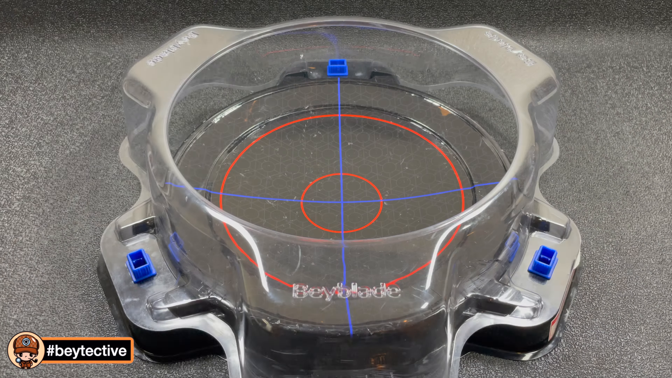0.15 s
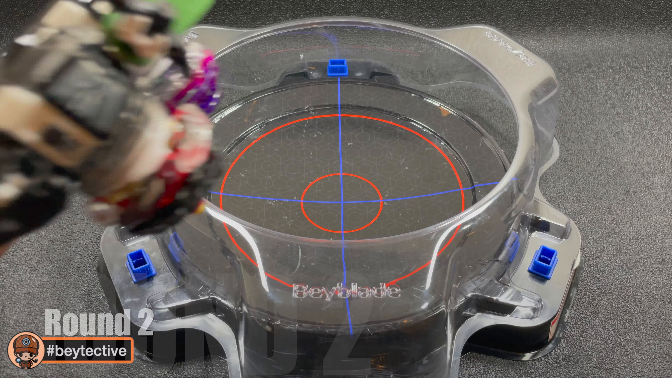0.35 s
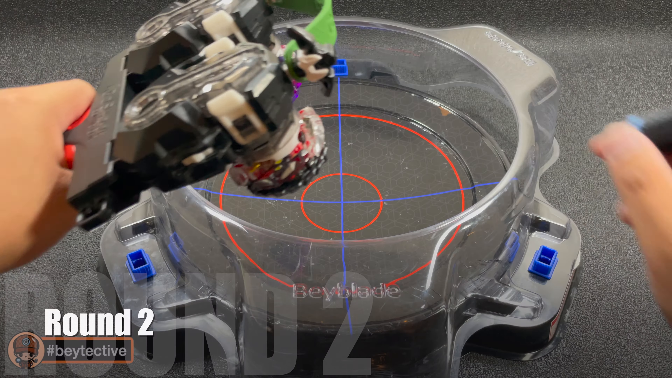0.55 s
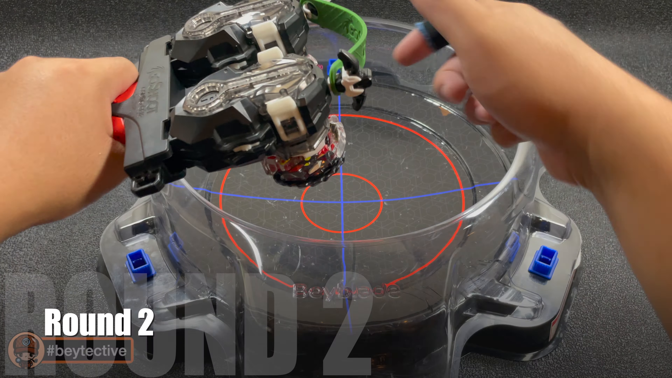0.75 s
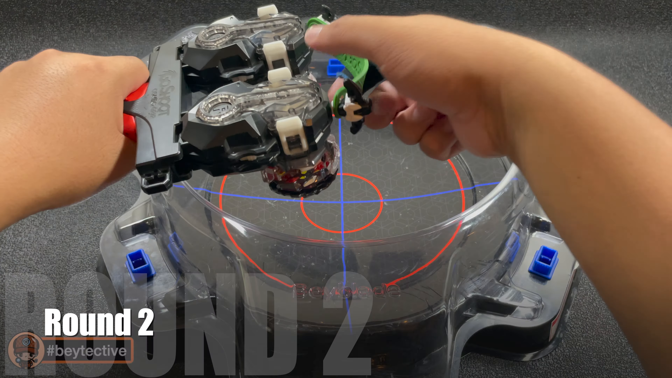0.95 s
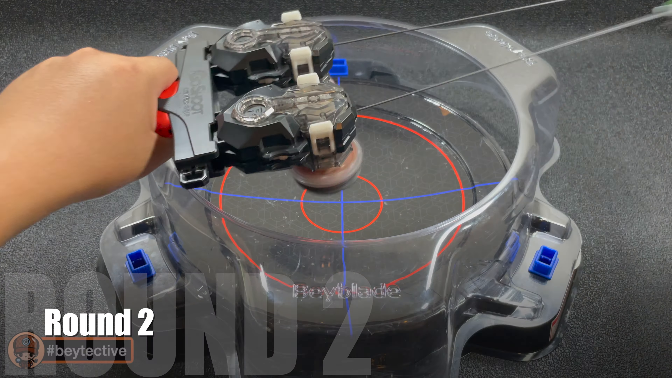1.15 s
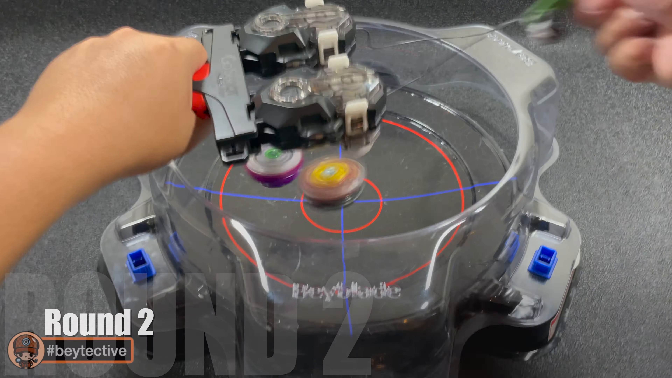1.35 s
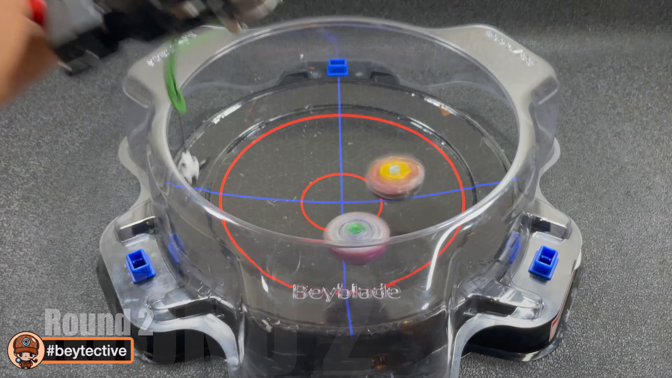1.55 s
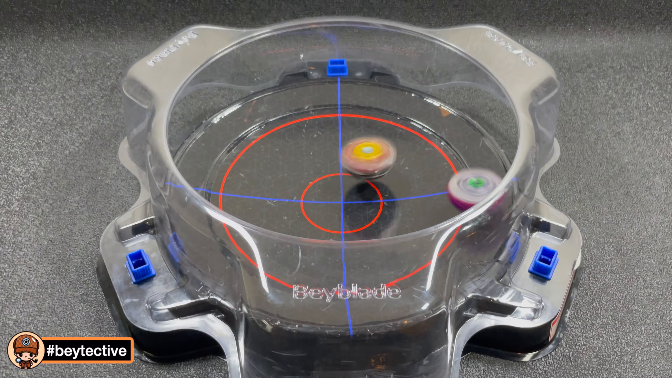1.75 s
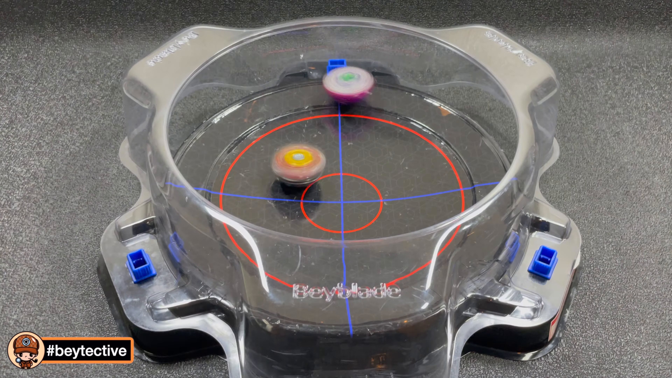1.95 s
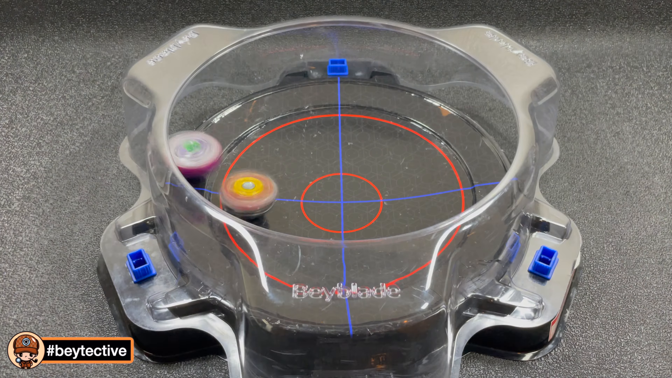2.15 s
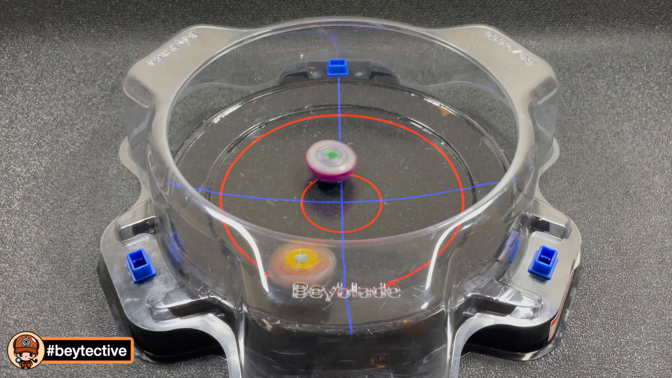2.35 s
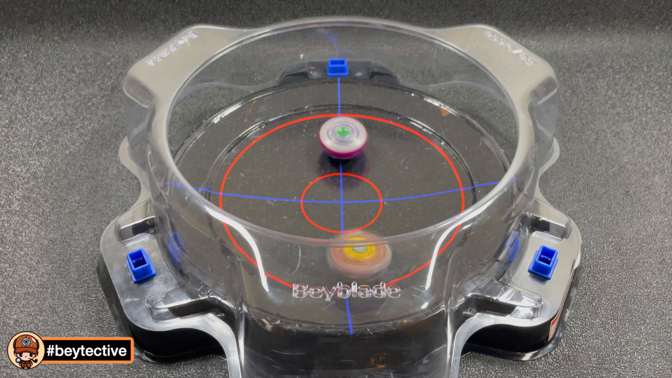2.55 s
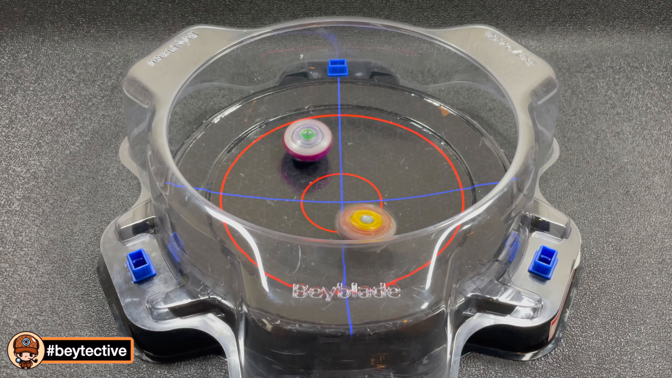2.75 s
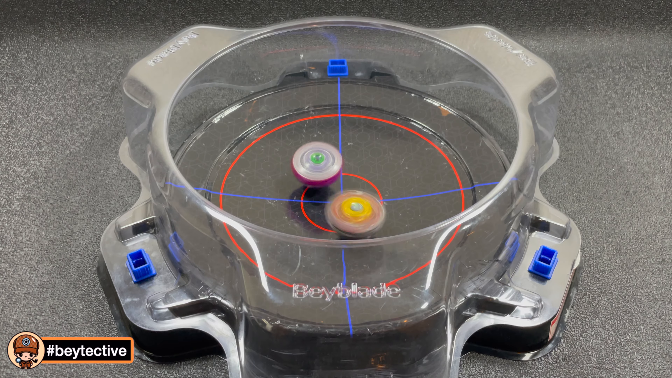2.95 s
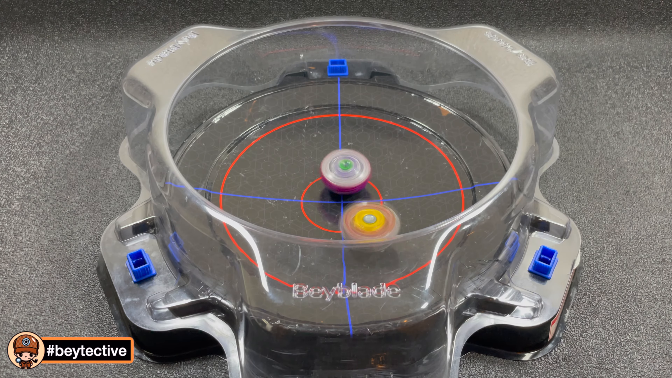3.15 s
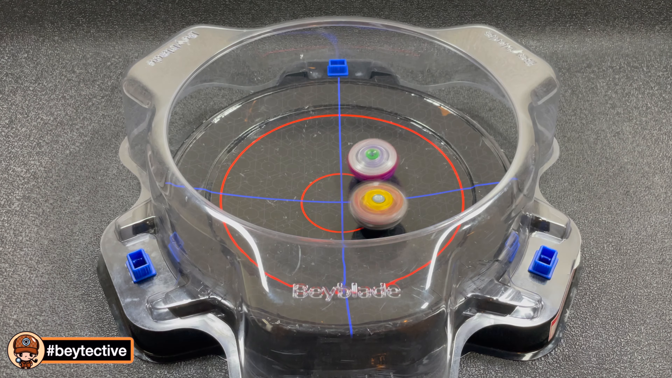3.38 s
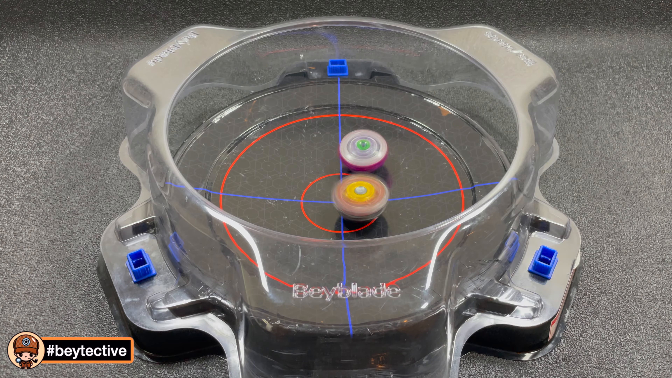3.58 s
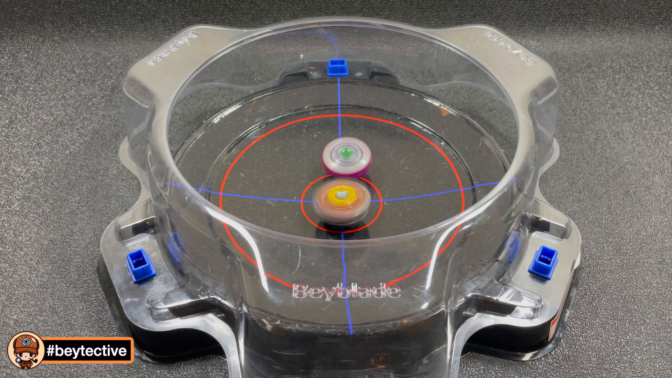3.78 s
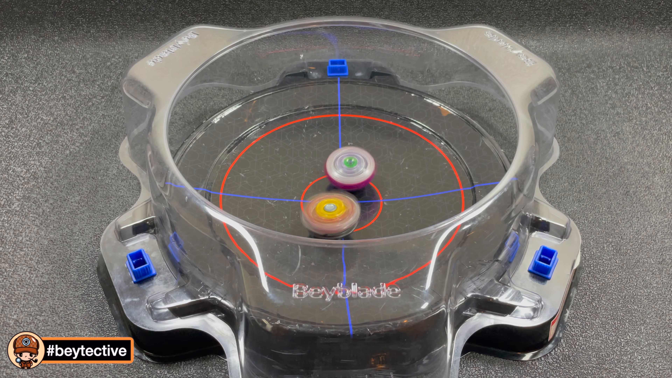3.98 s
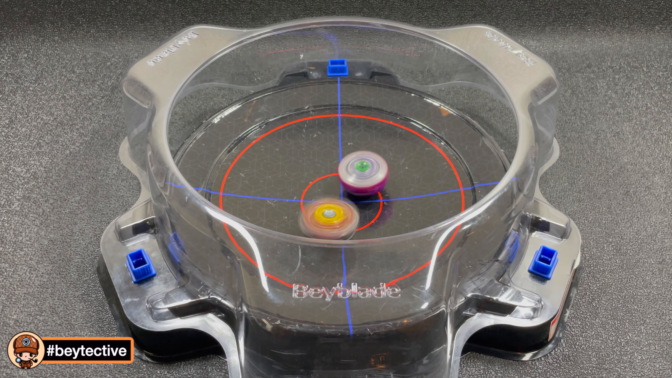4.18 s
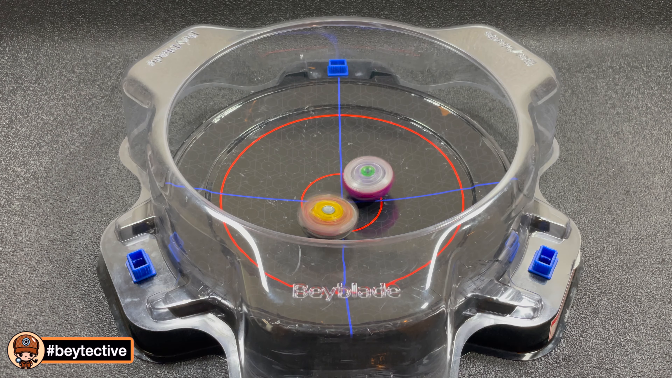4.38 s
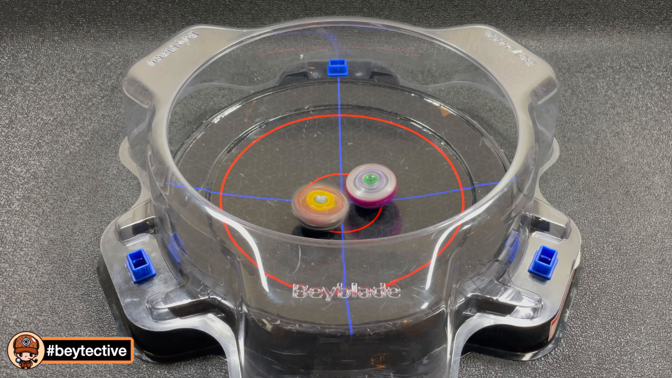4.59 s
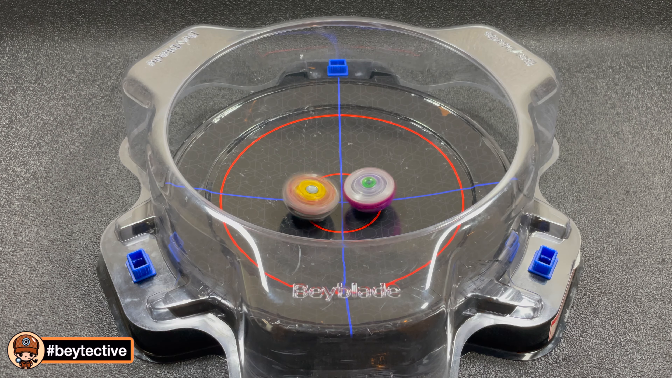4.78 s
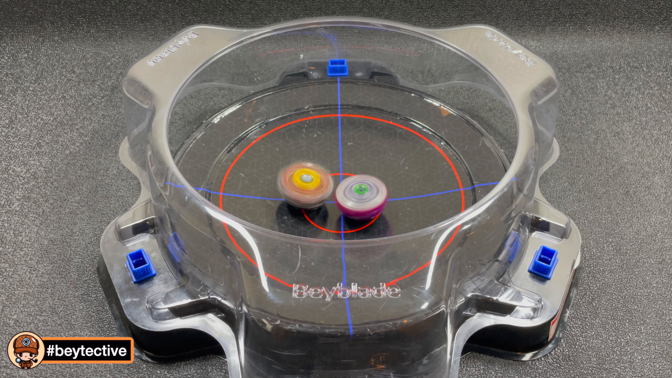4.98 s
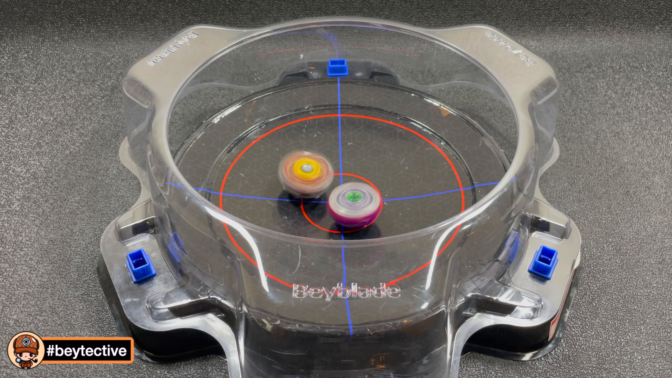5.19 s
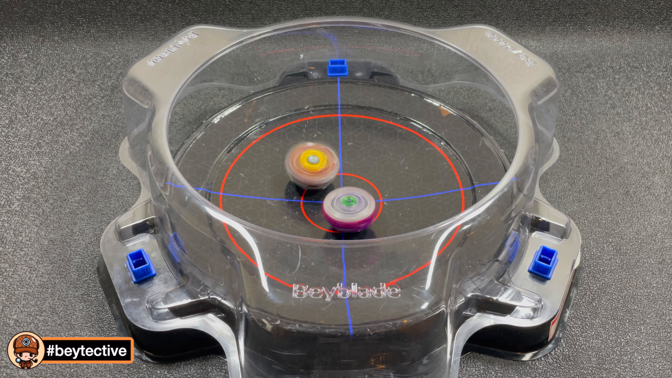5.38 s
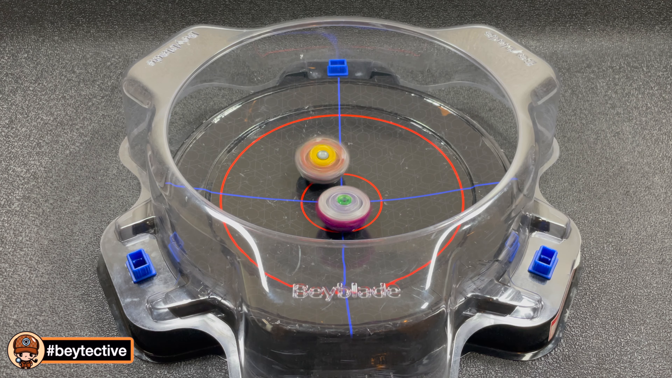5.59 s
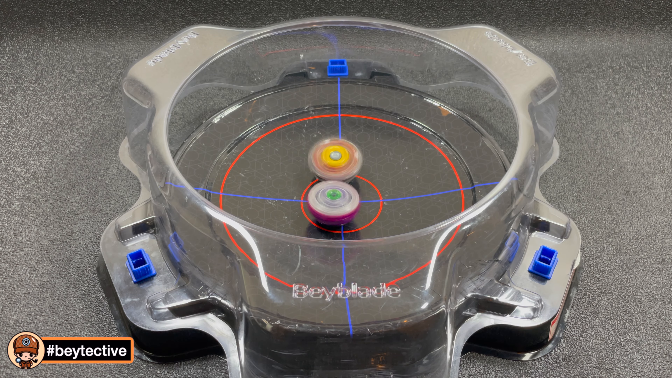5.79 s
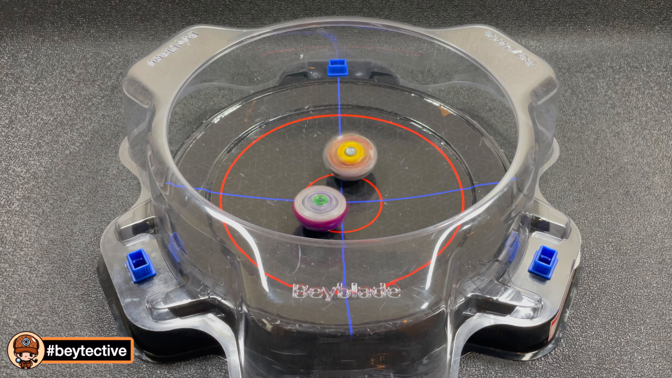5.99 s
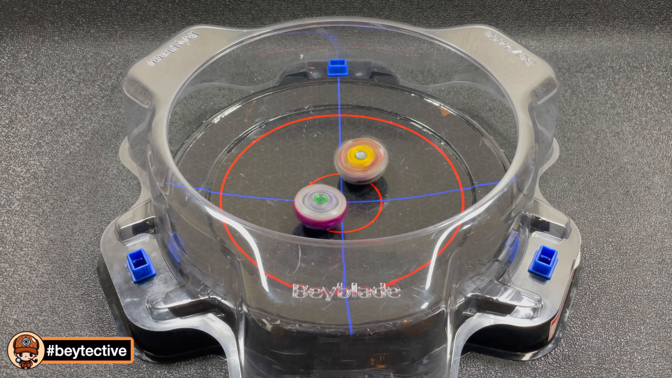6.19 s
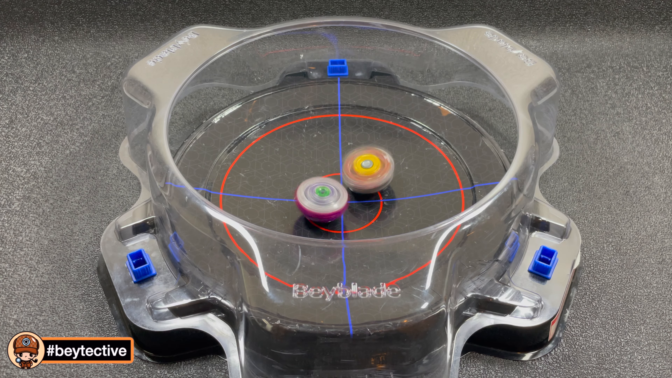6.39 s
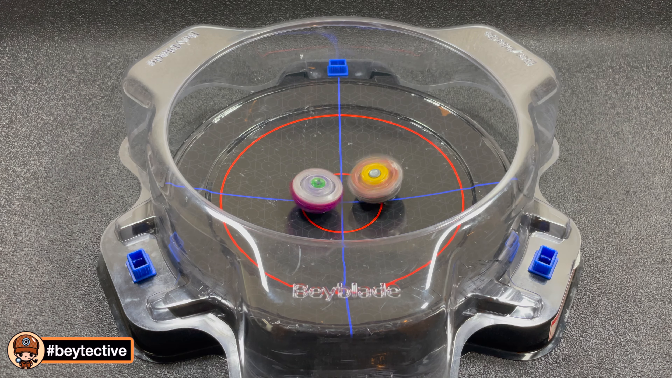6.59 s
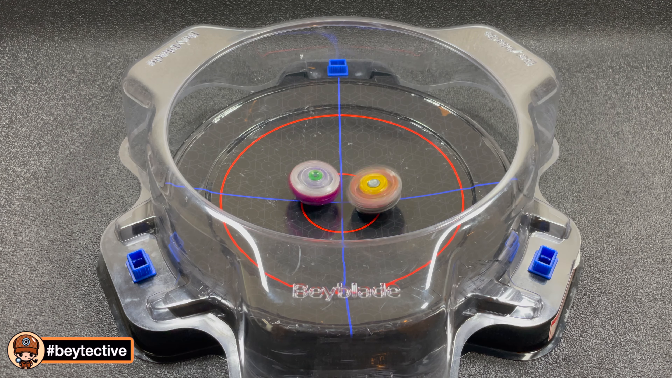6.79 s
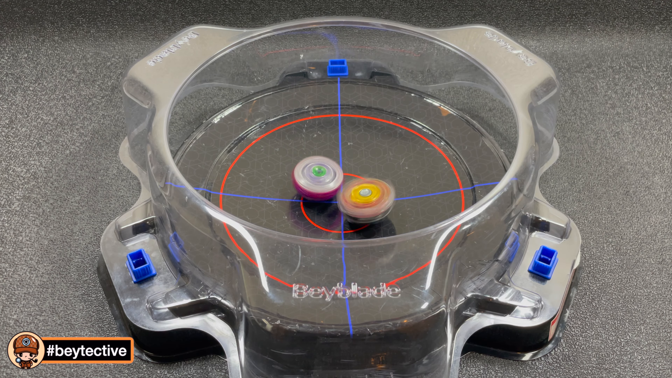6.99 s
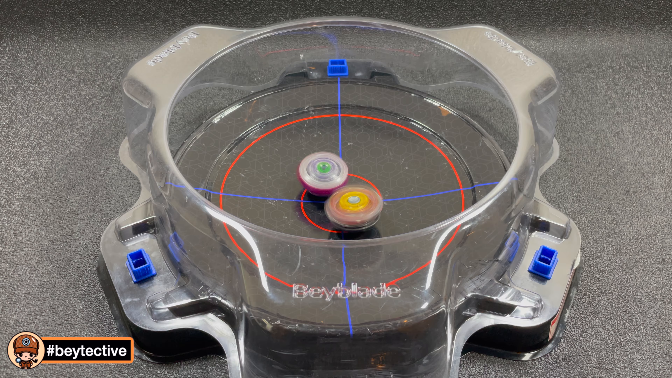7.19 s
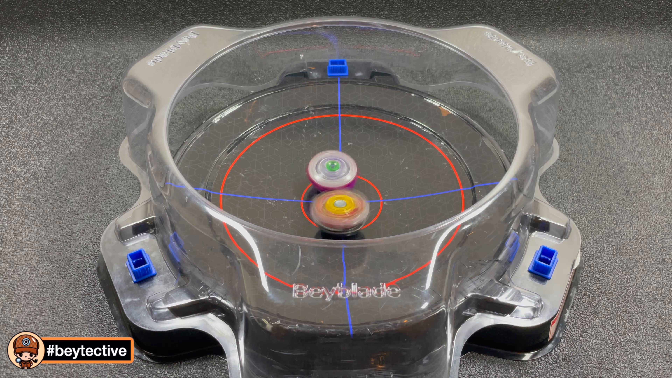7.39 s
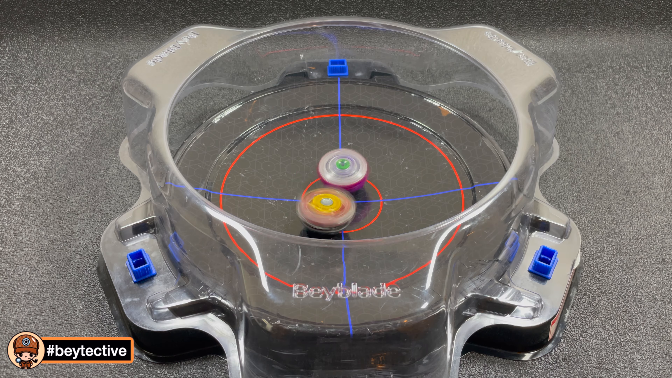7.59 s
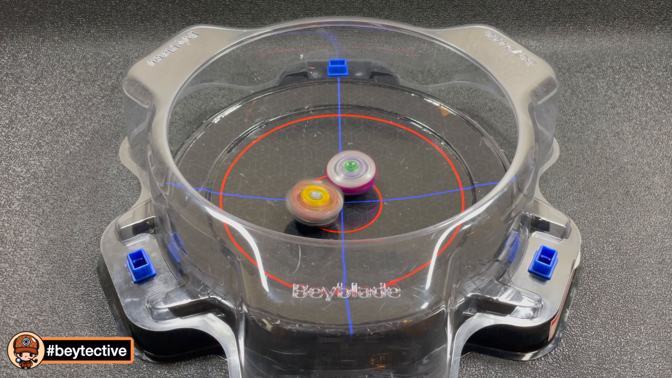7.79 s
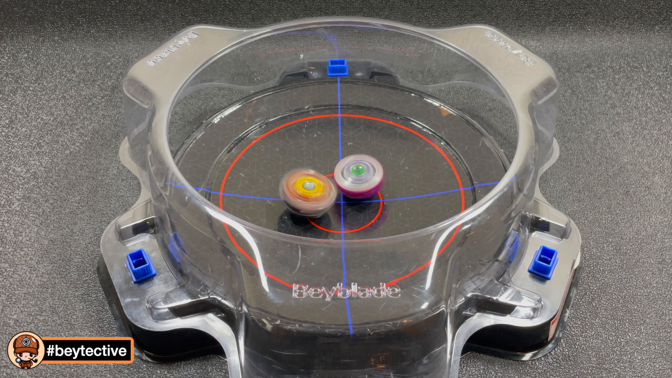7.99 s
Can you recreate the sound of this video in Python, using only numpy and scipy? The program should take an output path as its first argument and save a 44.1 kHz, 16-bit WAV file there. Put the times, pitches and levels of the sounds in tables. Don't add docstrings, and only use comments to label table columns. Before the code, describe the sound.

Near silence and a tiny plastic scuff, a brief gear-teeth zip, then a dense burst of hard knocks as two spinning tops land and strike a resonant plastic arena on a table that thuds low. Scraping and ticking thin out into faint whirrs, broken by sharp top-against-top clacks that weaken toward the end. Recorded close in a small, lightly reverberant room, with soft air murmur.

```python
import sys
import numpy as np
from scipy import signal
from scipy.fft import rfft, irfft, next_fast_len
from scipy.io import wavfile
from scipy.ndimage import uniform_filter1d

SR = 44100
rng = np.random.default_rng(int(sys.argv[2]) if len(sys.argv) > 2 else 0)


def invert_db(level):
    return 10 ** (np.asarray(level, dtype=float) / 20)


def to_wav(sig):
    pcm = np.clip(np.atleast_2d(sig), -1, 1) * 32767
    pcm = np.round(pcm).astype(np.int16)
    wavfile.write(sys.argv[1], SR, pcm.T)


N = 354563
T = np.arange(N) / SR


def unit(x):
    return x / np.sqrt(np.mean(x ** 2))


def colour(x, points):
    hz, db = np.transpose(points)
    n = next_fast_len(x.shape[-1])
    f = np.maximum(np.arange(n // 2 + 1) * SR / n, 1)
    gain = invert_db(np.interp(np.log(f), np.log(hz), db))
    return irfft(rfft(x, n) * gain, n)[..., :x.shape[-1]]


def ring(x, modes):
    click = np.eye(1, 8192)[0]
    body = 0
    for k, (hz, width, db) in enumerate(modes):
        body = body + (-1) ** k * invert_db(db) * signal.lfilter(*signal.iirpeak(hz, hz / max(width, 5), SR), click)
    return signal.oaconvolve(x, body / np.sqrt(np.sum(body ** 2)))[:len(x)]


def walk(rate):
    k = int(SR / rate)
    held = np.repeat(rng.standard_normal(N // k + 1), k)
    return unit(uniform_filter1d(uniform_filter1d(held, k), k)[:N])


def grit(per_s, spread_db):
    out, count = np.zeros(N), int(per_s * N / SR)
    sizes = invert_db(spread_db * rng.exponential(size=count)) * rng.standard_normal(count)
    out[rng.integers(N, size=count)] = sizes
    return unit(out)


def curves(table):
    s, *columns = np.transpose(table)
    return [np.interp(T, s, c) for c in columns]


# start_s [s], clack_db [dB], boom_db [dB], boom_hz [Hz], metal_ring_hz [Hz]
CLACKS = [(2.932, -14, -26, 510, 4700), (3.5217, -20.5, -29.5, 536, 4140),
          (3.7368, -19.5, -31.5, 490, 4550), (3.923, -18.5, -36, 536, 4780),
          (4.557, -22.5, -31.5, 518, 4126), (4.927, -30, -49.5, 407, 4250), (5.8368, -20, -39.5, 559, 4720),
          (6.4614, -25.5, -38, 562, 4700), (6.9815, -27, -44, 396, 4500), (7.3178, -31.5, -54.5, 403, 4810),
          (7.3652, -35.5, -55, 485, 4800), (7.448, -32, -50.5, 520, 5050), (7.88, -28.5, -43.5, 429, 4750),
          (7.9266, -40, -55.5, 503, 4760), (7.9885, -30.5, -42.5, 507, 4730)]
# rim_db [dB], sheen_db [dB], both above the clack, chatter_ms [ms]
CLACK_TOUCH = [(-17.5, -3, 11), (-14, 0.5, 4), (-19.5, -1.5, 5), (-15.5, -2.5, 5.33), (-19, -3, 5.5),
               (-25.5, -2, 5.3), (-19, -4, 6.5), (-20, -2, 6), (-20, -2.5, 5.5), (-27.5, 1.5, 5.1),
               (-22, 0, 5.85), (-16, -1, 6.16), (-20.5, -0.5, 5.46), (-13.5, 0, 6), (-18.5, -4, 6.1)]
# start_s [s], clack_db [dB], rim_db [dB],
# sheen_db [dB above the clack], chatter_ms [ms]
BOUNCES = [(1.214, -11.5, -24, -20.5, 1.2), (1.2785, -19, -14, -19, 3.5), (1.3086, -18.5, -12, -9.5, 6.4),
           (1.512, -12.5, -7.5, -16, 2.6), (1.5344, -15.5, -20, -9, 4.4),
           (1.5819, -12.5, -10.5, -26.5, 3.6), (2.0157, -19, -11, -17, 6.1), (2.0191, -16.5, -6, -25, 5.9),
           (2.0261, -15.5, -6.5, -20, 7.6), (2.1487, -12, -6.5, -21.5, 7.1), (2.16, -18, -7, -8, 1.6),
           (2.1868, -6.5, -20, 1.5, 2.5)]
# start_s [s], level_db [dB]
HOPS = [(1.0716, -37.5), (1.1033, -32), (1.412, -36.5), (1.457, -39.5), (1.6688, -28.5), (1.695, -32.5),
        (1.7686, -34), (1.804, -35.5), (1.866, -29), (1.8968, -38.5), (1.93, -31.5), (1.9574, -34),
        (2.3093, -30.5), (2.3443, -40.5), (2.385, -37.5), (2.419, -40.5), (3.021, -36.5), (3.914, -39.5)]
# pitch_hz [Hz], width_hz [Hz], level_db [dB]
BODY = [(3040, 1700, -8.5), (4240, 450, 1.5), (4750, 310, 2.5), (5194, 290, 1), (5980, 820, -3)]
# pitch_hz [Hz], width_hz [Hz], level_db [dB]
RIM = [(1100, 150, -2), (1520, 210, 1), (1990, 620, -1), (2810, 670, 1), (3350, 460, -0.5)]
# pitch_hz [Hz], width_hz [Hz], level_db [dB]
SHEEN = [(10000, 6400, 12), (15000, 16100, 6)]
RADIATION_DB = (-10, -2, -2.5)


def blows():
    force, click, t = np.zeros((3, N + SR)), np.zeros((3, N)), T[:SR // 10]
    hops = [(s, db, -11.5, -14, 13) for s, db in HOPS]
    clacks = [(s, db, *touch) for (s, db, *_), touch in zip(CLACKS, CLACK_TOUCH)]
    for s, db, rim_db, sheen_db, ms in BOUNCES + hops + clacks:
        i, size = int(s * SR), invert_db(db + np.array([0, rim_db, sheen_db]))
        chatter = 1 / (1 + (t * 1000 / max(ms, .5)) ** 4)
        settling = 0.33 * np.exp(-t / .02)
        snap = 0.45 * np.exp(-t / 0.0002)
        shape = np.minimum(t / 0.00005, 1) * (chatter + settling + snap)
        force[:, i:i + len(t)] += size[:, None] * shape
        echoes = i + np.cumsum([0, *rng.integers(9, 90, 3)])
        click[:, echoes] += np.outer(size * np.sqrt(np.sum(shape ** 2)), [.95, .1, -.1, .1])
    contacts = grit(14000, spread_db=0.9)
    force = force[:, :N] * contacts * np.sign(rng.standard_normal((3, N)))
    click[2] *= -1
    parts = (BODY, RIM, SHEEN)
    return [sum(invert_db(db) * ring(f, modes) for db, f, modes in zip(RADIATION_DB, push, parts))
            for push in (force, click)]


def sing():
    linger_db, linger_s = -39, 0.3
    out, t = np.zeros(N + SR), T[:SR // 3]
    for (s, db, *_, hz), chance in zip(CLACKS, rng.random((len(CLACKS), 32))):
        i = int((s + .002) * SR)
        pair = np.sin(2 * np.pi * hz * t) + 0.4 * np.sin(2 * np.pi * 1.13 * hz * t)
        cluster = sum(np.sin(2 * np.pi * (hz * (.94 + 0.13 * u) * t + turn)) for u, turn in chance.reshape(-1, 2))
        fading = invert_db(-11) * pair * np.exp(-t / 0.0045) + invert_db(linger_db - 60 * t / linger_s) * cluster
        out[i:i + len(t)] += invert_db(db) * fading * np.minimum(t / 0.0012, 1)
    return out[:N]


# start_s [s], level_db [dB], pitch_hz [Hz], ring_s [s], thump_db [dB above it]
THUDS = [(1.277, -14, 404, 0.068, -10), (1.306, -18.5, 356, 0.069, -9.5), (1.334, -36, 380, 0.075, -10),
         (1.511, -23.5, 693, 0.042, -10.5), (1.512, -27, 1148, 0.084, -28.5),
         (1.523, -18, 481, 0.11, -16.5), (1.521, -22.5, 249, 0.086, -14.5), (1.581, -25, 567, 0.19, -23.5),
         (1.582, -20.5, 919, 0.1, -31), (1.582, -25, 1173, 0.068, -29.5), (1.582, -27.5, 305, 0.1, -15),
         (1.309, -20.5, 516, 0.057, -22), (1.31, -20.5, 190, 0.065, -13), (1.667, -28, 1270, 0.031, -30),
         (1.277, -24, 1100, 0.04, -30), (1.667, -33, 800, 0.073, -15), (1.691, -26.5, 380, 0.085, -13),
         (1.768, -39, 227, 0.16, -4.5), (1.801, -29, 510, 0.061, -18), (1.865, -29, 434, 0.074, -12.5),
         (1.928, -25, 510, 0.038, -28), (2.0205, -9, 676.4, 0.11, -40.5), (2.029, -12, 784, 0.04, -42),
         (2.024, -24, 1323, 0.07, -41), (2.044, -21, 623, 0.053, -42), (2.019, -25.5, 417, 0.068, -31.5),
         (2.149, -9.5, 858, 0.047, -33), (2.172, -22, 1060, 0.14, -40.5), (2.154, -11, 535, 0.092, -35),
         (2.154, -16, 1129, 0.08, -41), (2.186, -25, 905, 0.085, -23), (2.308, -32.5, 260, 0.04, -6.5),
         (3.015, -33, 289, 0.095, -2)]
# start_s [s], level_db [dB], pitch_hz [Hz]
KNOCKS = [(2.935, -26, 1100), (3.522, -32.5, 293.6), (3.522, -54, 859), (3.737, -38, 755),
          (3.923, -33.5, 826), (4.556, -44, 894), (4.559, -38, 356), (4.927, -48.5, 300.2),
          (5.835, -41, 1150), (5.839, -35, 1466), (5.838, -40, 204), (6.462, -40.5, 745),
          (6.464, -35, 1150), (6.981, -35, 2136), (6.982, -44.5, 501), (5.838, -35, 2114),
          (6.981, -62, 963), (6.982, -47.5, 250), (6.982, -55, 1524), (7.319, -43, 1353),
          (7.319, -48.5, 862), (7.366, -45.5, 970), (7.45, -44.5, 947), (7.879, -46, 815),
          (7.88, -37, 1560), (7.988, -48.5, 786), (7.986, -46.5, 1560)]
# pitch_hz [Hz], width_hz [Hz], level_db [dB]
BOWL = [(250, 110, -5.5), (380, 37, -5.5), (548, 25, 1), (654, 28, -6.5), (830, 130, -2.5)]
# pitch_hz [Hz], width_hz [Hz], level_db [dB]
TABLE = [(73, 11, 0.5), (115, 48, 0.5), (171, 70, -2.5)]


def thuds():
    boom_s, table_thump_db = 0.036, -28
    tone, push, t = np.zeros(N + SR), np.zeros((2, N + SR)), T[:SR // 4]
    booms = THUDS + [(s, db, hz, boom_s, table_thump_db) for s, _, db, hz, _ in CLACKS]
    booms = booms + [(s, db, hz, boom_s, table_thump_db) for s, db, hz in KNOCKS]
    for (s, db, hz, t60, thump_db), (up, down, turn) in zip(booms, rng.random((len(booms), 3))):
        i = int(s * SR)
        trio = np.sin(2 * np.pi * hz * t)
        trio += .45 * np.sin(2 * np.pi * (hz * (1.05 + .06 * up) * t + .2 * turn))
        trio += .45 * np.sin(2 * np.pi * (hz * (.95 - .06 * down) * t - .2 * turn))
        tone[i:i + len(t)] += invert_db(db) * trio * np.minimum(t / 0.0014, 1) * invert_db(-60 * t / max(t60, .02))
        push[:, i:i + len(t)] += invert_db(db + np.array([[0], [thump_db]])) * np.exp(-t / 0.014)
    push = push[:, :N] * rng.standard_normal(N)
    return tone[:N] + invert_db(-18.5) * ring(push[0], BOWL) + invert_db(-4) * ring(push[1], TABLE)


# start_s [s], rasp_db [dB], sheen_db [dB above the rasp]
CORD = [
    (1.05, -62, -25),
    (1.07, -55.5, -5),
    (1.126, -34.5, -1),
    (1.2, -27, -7),
    (1.3, -55, -4),
]
# freq_hz [Hz], density_db [dB per Hz]
RASP = [(120, -57), (200, -35), (468, -20), (819, -10.5), (998, -10), (1700, -8), (2400, -7.5), (3300, 2),
        (5200, -1), (7500, -11.5), (9750, -40), (16500, -120)]


def cord():
    rasp_db, sheen_db = curves(CORD)
    on = np.clip((T - 1.052) / 0.01, 0, 1) * np.clip((1.3 - T) / 0.019, 0, 1)
    teeth = grit(11000, spread_db=-1.0) * invert_db(.8 * walk(150))
    return on * invert_db(rasp_db) * (unit(colour(teeth, RASP)) + invert_db(sheen_db) * unit(ring(teeth, SHEEN)))


def skips(turns, even, patchy_db, per_s, share):
    bunched = even + np.exp(-(turns % 1) / share)
    return unit(grit(per_s, spread_db=-1.0) * bunched * invert_db(patchy_db * walk(25)))


# start_s [s], length_s [s], whirr_db [dB], whirr_hz [Hz], scrape_db [dB]
LEANS = [
    (2.45, 0.27, -77, 4600, -81),
    (2.73, .17, -86, 4700, -84.5),
    (3.058, 0.15, -86, 4662, -74.5),
    (3.198, 0.16, -67.5, 4750, -72.5),
    (3.37, .15, -60, 5023, -78.5),
    (4.111, 0.31, -69.5, 5100, -88.5),
    (5.064, 0.37, -93, 4940, -92),
    (5.95, 0.13, -69, 4650, -100.5),
    (6.697, 0.072, -92.5, 4775, -84.5),
    (7.16, .15, -89.5, 4900, -103),
]


def leaning():
    fade_s, climb, climb_s = 0.015, 0.042, 0.04
    whirr, scrape, hz = np.zeros(N), np.zeros(N), np.full(N, 4700.)
    spin_hz = 92 * np.exp(-.105 * T)
    turns = np.cumsum(spin_hz * (1 + 0.031 * walk(32))) / SR
    for s, length, whirr_db, whirr_hz, scrape_db in LEANS:
        rise, fall = (T - s) * 3 + fade_s, (s + length - T) / 2 + fade_s
        on = np.clip(np.minimum(rise, fall) / fade_s, 0, 1)
        whirr, scrape = whirr + invert_db(whirr_db) * on, scrape + invert_db(scrape_db) * on
        hz = np.where(on > 0, whirr_hz * (1 - climb * np.exp(-np.maximum(T - s, 0) / climb_s)), hz)
        turns = np.where(T > s - fade_s, turns - turns[int(s * SR)], turns)
    return whirr, scrape, hz, turns


# pitch_hz [Hz], width_hz [Hz], level_db [dB]
GAP = [(1600, 200, -9), (2576, 500, -7.5), (3830, 170, -2), (5100, 1600, -4), (7400, 1300, -14.5)]


def whirring(skip_db):
    lean, scrape, whirr_hz, turns = leaning()
    spin = skips(turns, .12, patchy_db=2.5, per_s=14000, share=.16)
    roughness = uniform_filter1d(spin * np.sin(2 * np.pi * np.cumsum(whirr_hz) / SR) * 0 + spin, size=60)
    roughness = uniform_filter1d(roughness, size=40)
    whirr = unit(roughness * np.sin(2 * np.pi * np.cumsum(whirr_hz) / SR))
    whirr += invert_db(-5.5) * ring(spin, GAP)
    whirr *= invert_db(-51 + skip_db + 50.0) * np.clip((T - 2.2) / 0.11, .3, 1) + lean
    rub = skips(turns, 0.06, patchy_db=3, per_s=14000, share=.12)
    return whirr, scrape * invert_db(7) * ring(rub, [(1570, 110, 0), (3350, 500, -14)])


# pitch_hz [Hz], width_hz [Hz], level_db [dB]
RATTLE = [(2850, 250, -6), (4450, 320, 3), (5950, 240, 2), (9000, 330, 0), (11900, 400, -3),
          (13800, 500, -10)]


def rattling():
    wobbles = np.cumsum(29 * (1 + 0.059 * walk(22))) / SR
    knocks = skips(wobbles, 0.25, patchy_db=4, per_s=4000, share=.2)
    bare = knocks * np.sign(rng.standard_normal(N))
    return ring(knocks, RATTLE) + invert_db(-1.5) * ring(knocks, RIM) + invert_db(-16) * bare


# start_s [s], level_db [dB]
JOLTS = [(.16, -65.5), (1.05, -61), (1.23, -37), (1.37, -57), (1.5, -38.5), (1.63, -40), (1.77, -41),
         (2.002, -47), (2.15, -44), (2.272, -50.5), (2.41, -48), (2.6, -55), (2.78, -54), (2.93, -44.5),
         (3.18, -56), (3.531, -56.5), (3.94, -58.5), (4.57, -71.5), (5.85, -58), (6.47, -58), (6.98, -67),
         (7.88, -83)]


def jolted():
    since = [(np.maximum(T - s, 0) / 0.076, db) for s, db in JOLTS]
    return np.sqrt(sum((invert_db(db) * u * np.exp(1 - u)) ** 2 for u, db in since))


# pitch_hz [Hz], width_hz [Hz], level_db [dB]
DRONE = [(104, 26, -3), (241, 13, -2), (289, 340, -1.5), (414.7, 380, -2)]


def droning(skip_db):
    lagged_db = np.maximum(skip_db, np.interp(T - .35, T, skip_db))
    level = invert_db(-46 + 0.67 * (lagged_db + 51.5)) + invert_db(-13.5) * jolted() * (T > 1.2)
    level = level * np.where(abs(T - 1.2) < .07, .1, 1)
    return invert_db(-7) * level * ring(grit(2200, spread_db=1.2), DRONE)


# start_s [s], level_db [dB]
ROLL = [(1.12, -105), (1.25, -63.5), (1.48, -49), (1.9, -61.5), (2.1, -41), (2.28, -68), (2.53, -58),
        (2.68, -77), (2.715, -79.5), (2.75, -65.5), (2.95, -60), (3.18, -69), (3.9, -77), (4.14, -84),
        (4.41, -86.5), (5.75, -99), (6.54, -94), (8.04, -89.5)]
# pitch_hz [Hz], width_hz [Hz], level_db [dB]
HUM = [(59, 9, 0.5), (115, 11, 1.5), (162.56, 15, -5)]


def rolling():
    (skip_db,) = curves(ROLL)
    landed = T > 1.28
    whirr, scrape = whirring(skip_db)
    tops = landed * (invert_db(skip_db - 3.0) * rattling() + invert_db(-3.5) * whirr)
    hum = invert_db(-68.5) * ring(rng.standard_normal(N), HUM) * np.where(landed, 1, .45)
    return tops + hum + scrape + droning(skip_db)


# start_s [s], level_db
# [dB], scrape_ms [ms]
SCRAPES = [(2.236, -34.5, 7.6), (2.255, -36, 13.4), (2.3447, -34.5, 5.6), (2.363, -37.5, 2.3),
           (2.3846, -44, 2.6), (2.4021, -35, 7), (2.4425, -37.5, 5.1), (2.462, -41, 4.4),
           (2.496, -43.5, 4.5), (2.516, -65, 3.9), (2.55, -72.5, 7.1), (2.585, -55.5, 7), (2.658, -54, 11),
           (0.03, -81.5, 210), (0.22, -88, 170), (0.41, -88, 150), (0.6, -95, 170), (0.8, -95, 170),
           (.96, -88, 100), (2.809, -53, 6.4), (2.85, -66.5, 6.7), (2.894, -57, 5.9), (5.38, -68, 11),
           (1.391, -41, 10), (1.435, -42.5, 9.8), (1.476, -41.5, 23), (1.72, -42.5, 8.4), (1.63, -38.5, 13),
           (2.988, -33.5, 7.9), (3.053, -43.5, 7.5), (7.129, -67.5, 10), (7.162, -61.5, 8.2),
           (7.182, -69, 6.4)]
# pitch_hz [Hz], width_hz [Hz], level_db [dB]
WALL = [(450, 570, -1), (1150, 350, 3), (1470, 140, 2.5), (2804, 690, 0.5), (4600, 3300, -4.5),
        (9000, 5900, -16)]


def scrapes():
    rub, t = np.zeros(N), T[:SR // 5]
    for s, db, ms in SCRAPES:
        i = int(s * SR)
        rub[i:i + len(t)] += invert_db(db) * np.minimum(t / 0.0016, 1) * np.exp(-t * 1000 / max(ms, 1))
    return ring(rub * grit(12000, spread_db=2.2), WALL)


# start_s [s], level_db [dB], pitch_hz [Hz], ring_s [s]
TICKS = [(2.347, -36, 4400, .02), (2.364, -37, 3500, .02), (2.3833, -33, 4430, .02),
         (2.406, -43.5, 4700, .02), (2.4211, -30, 4740, .02), (2.446, -41, 4700, .02),
         (2.562, -63, 4760, .015), (2.588, -60.5, 4520, .012), (2.741, -49, 4500, .012),
         (2.472, -39, 4700, 0.033), (2.528, -61, 5110, 0.027), (2.605, -52, 4530, 0.0071),
         (2.6268, -39.5, 5920, 0.0246), (2.641, -45, 4340, 0.013), (2.614, -43, 4400, 0.012),
         (2.673, -51, 4400, 0.014), (2.688, -48.5, 4400, 0.012), (2.749, -51, 4500, 0.012),
         (2.776, -56, 4300, 0.012), (2.793, -52.5, 4400, 0.011), (3.389, -55, 5000, 0.022),
         (2.6552, -43.5, 5920, 0.033), (2.7323, -48, 4500, 0.01901), (2.765, -44.5, 4300, 0.0081),
         (2.809, -50, 4560, 0.025), (2.834, -43, 6330, 0.031), (2.8724, -57.5, 4760, 0.03),
         (2.91, -50.5, 5920, 0.02287), (3.147, -55, 4560, 0.028), (3.181, -54.5, 4560, 0.027),
         (3.2146, -66.5, 4360, 0.03), (3.2914, -67, 4500, 0.024), (3.32, -65, 4740, 0.033),
         (3.3736, -58, 4920, 0.053), (3.454, -62, 4960, 0.043)]


def ticks():
    taps, tone, t = np.zeros(N), np.zeros(N), T[:SR // 10]
    for s, db, hz, t60 in TICKS:
        i = int(s * SR)
        taps[i:i + len(t)] += invert_db(db) * np.exp(-t / 0.0025)
        tone[i:i + len(t)] += invert_db(db - 7) * np.sin(2 * np.pi * hz * t) * invert_db(-60 * t / max(t60, .005))
    return invert_db(-5.5) * ring(taps * rng.standard_normal(N), RATTLE) + tone


# start_s [s], level_db [dB], pitch_hz
# [Hz], scuff_ms [ms]
SCUFFS = [(0.4194, -69, 4200, 7.3), (0.4823, -59.5, 4430, 4.1), (1.97, -33, 2880, 25),
          (1.9871, -28, 4670, 19), (4.894, -58, 3300, 7.4), (6.1091, -65, 2225, 8.4),
          (6.1393, -76.5, 2312, 13), (6.1997, -73, 3350, 12.5), (6.2292, -48.5, 3170, 12),
          (6.262, -46, 3590, 9.8), (6.2844, -51.5, 3595, 19), (6.309, -60, 3550, 15),
          (6.696, -59, 3304, 8.7), (6.7214, -65, 3160, 8.7), (6.741, -65, 3400, 8), (6.762, -67, 3350, 8)]
# pitch_hz [Hz], width_hz [Hz], level_db [dB]
GRIP = [(1570, 140, -12), (2430, 180, -3), (3150, 150, 2), (3600, 180, 1), (5100, 450, 0),
        (7400, 1700, -17), (10500, 2700, -21)]


def scuffs():
    rub, ping, t = np.zeros(N), np.zeros(N), T[:SR // 5]
    for s, db, hz, ms in SCUFFS:
        i = int(s * SR)
        rub[i:i + len(t)] += invert_db(db) * np.minimum(t / 0.00041, 1) * np.exp(-t * 1000 / max(ms, 1))
        ping[i:i + len(t)] += invert_db(db - 8) * np.sin(2 * np.pi * hz * t) * np.exp(-t / .004)
    return invert_db(-6.5) * ring(rub * rng.standard_normal(N), GRIP) + ping


def swaying():
    mid, side = [ring(rng.standard_normal(N), [(35.4, 6.2, 0)]) for _ in range(2)]
    mid = mid / np.sqrt(uniform_filter1d(mid ** 2, SR // 12) + 0.057)
    return (jolted() + invert_db(-76.5)) * (mid + invert_db(-7.0) * side * np.array([[1], [-1]]))


# freq_hz [Hz], t60_s [s]
ROOM = [(150, 0.46), (500, 0.5), (1500, 0.31), (2800, 0.32), (4600, 0.33), (8000, 0.33), (12000, 0.3),
        (16000, 0.23)]
# freq_hz [Hz], side_db [dB]
ROOM_SIDE = [(100, -4.5), (500, -11), (1200, -9.5), (2500, -10), (5000, -10.5), (9000, 1), (14000, -7)]


def room(x):
    t, tail = T[:SR // 2 + SR // 4], 0
    hz, t60 = np.transpose(ROOM)
    for f in 90 * 2 ** np.arange(0, 8, .5):
        half_octave = [(f / 2 ** .5, -40), (f / 2 ** .25, -3), (f, 0), (f * 2 ** .25, -3), (f * 2 ** .5, -40)]
        band = colour(rng.standard_normal((2, len(t))), half_octave)
        tail = tail + band * invert_db(-60 * t / np.interp(np.log(f), np.log(hz), t60))
    mid, side = tail * np.clip((t - .002) / 0.0062, 0, 1) / np.sqrt(np.sum(tail[0] ** 2))
    side = colour(side, ROOM_SIDE)
    return invert_db(-6.5) * signal.fftconvolve(x[None], np.array([mid + side, mid - side]), axes=1)[:, :N]


def moved(x):
    place = np.searchsorted(np.array(CLACKS)[:, 0] - .003, T) % 3
    return sum(room(x * (place == k)) for k in range(3))


# freq_hz [Hz], density_db [dB per Hz]
AIR = [(21, -35), (35, -3), (81, -17.5), (112, -12.5), (217, -24), (253, -14.5), (280, -24.5), (318, -19),
       (465, -29), (854, -20.5), (2740, -34), (15000, -44.5)]


def air():
    mid, side = colour(rng.standard_normal((2, N)), AIR) * invert_db(1.5 * walk(1.5))
    return invert_db(-77.5) * (mid + invert_db(-10.5) * side * np.array([[1], [-1]])) / np.std(mid)


def scene():
    near, spread = blows()
    roll, boom = rolling(), thuds()
    small = ticks() + scuffs()
    rest = sing() + cord() + scrapes()
    wet = moved(spread + rest + invert_db(-7) * boom + invert_db(-5) * (roll + small))
    lean_left = invert_db(np.array([[1.36], [-1.36]]) / 2)
    return lean_left * (near + rest + small + boom + roll + wet) + swaying() + air()


def band_limit(x):
    return signal.sosfilt(signal.butter(12, 16990, fs=SR, output="sos"), x)


# freq_hz [Hz], level_db [dB]
MIC = [(9000, 0.5), (12000, -1), (15000, -3), (17000, -3.5)]


def record(dry):
    loaded = np.tanh(dry / 1.714) * 1.55 + invert_db(-95.0) * rng.standard_normal(N)
    loaded = signal.sosfilt(signal.ellip(6, 1, 31, 15750, fs=SR, output="sos"), loaded)
    return band_limit(colour(loaded, MIC))


dry = scene()
out = record(dry)
to_wav(out)
```